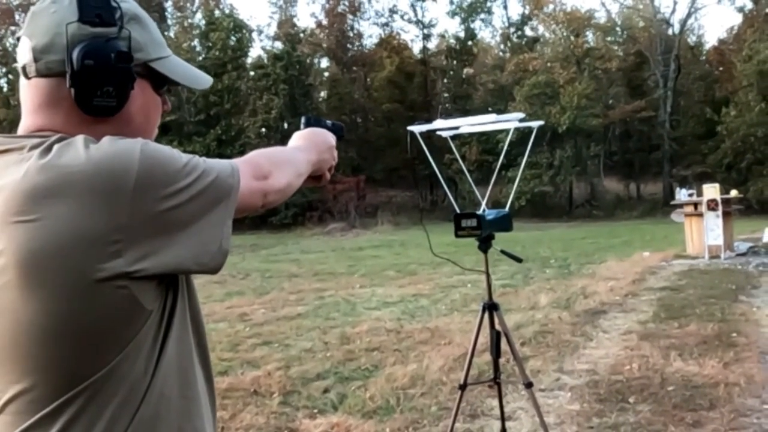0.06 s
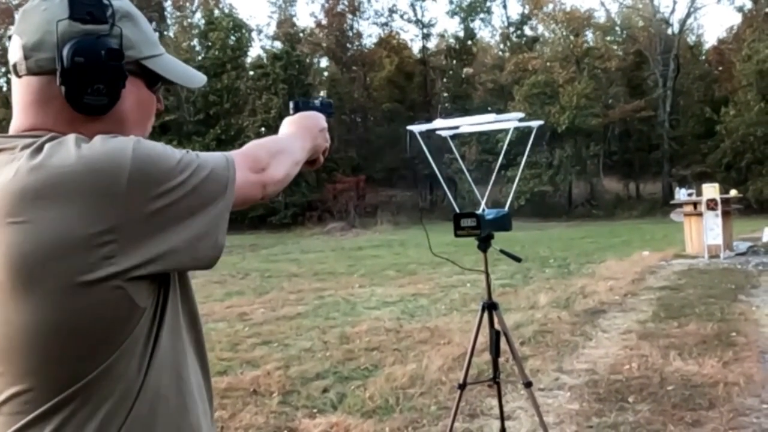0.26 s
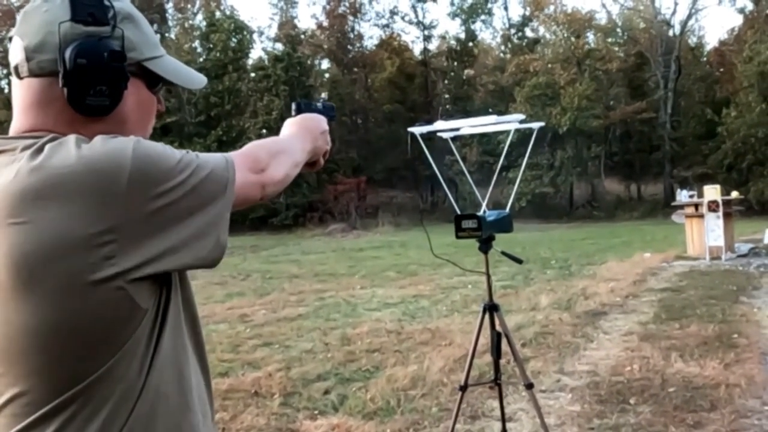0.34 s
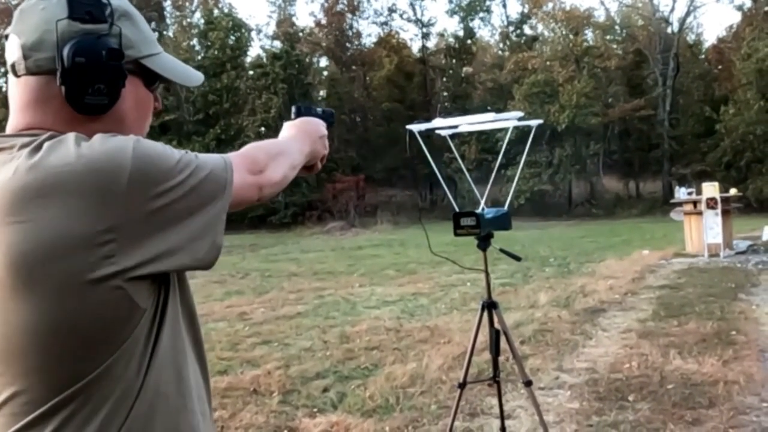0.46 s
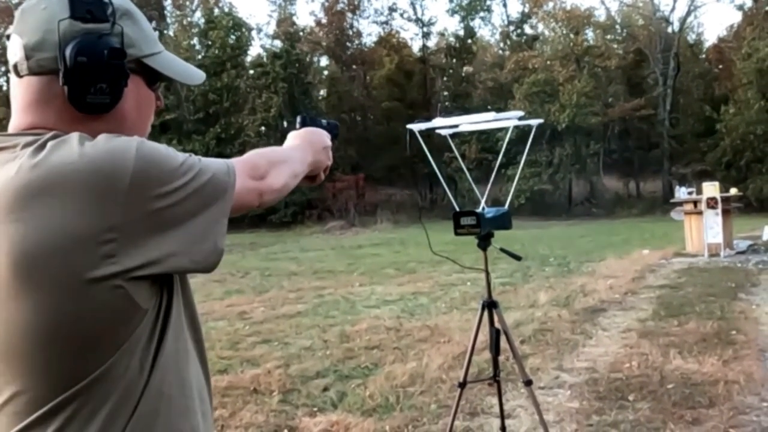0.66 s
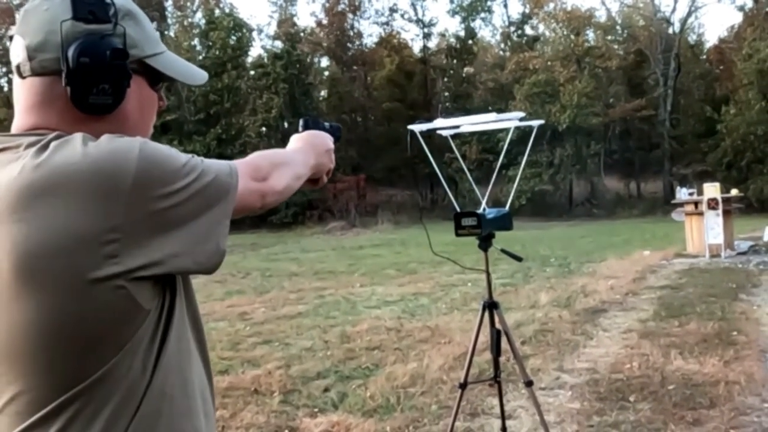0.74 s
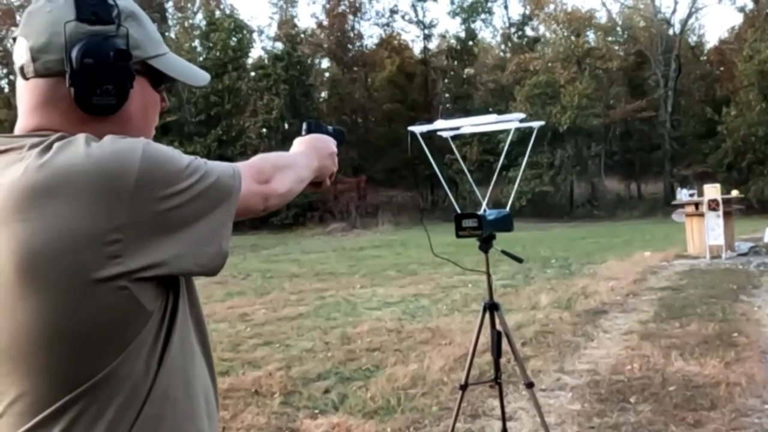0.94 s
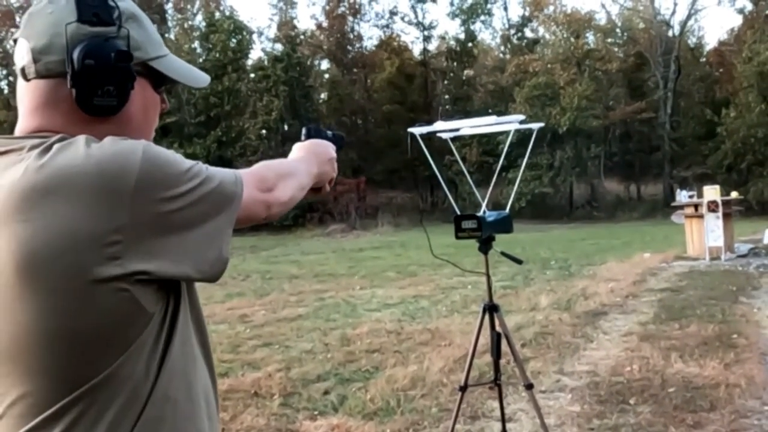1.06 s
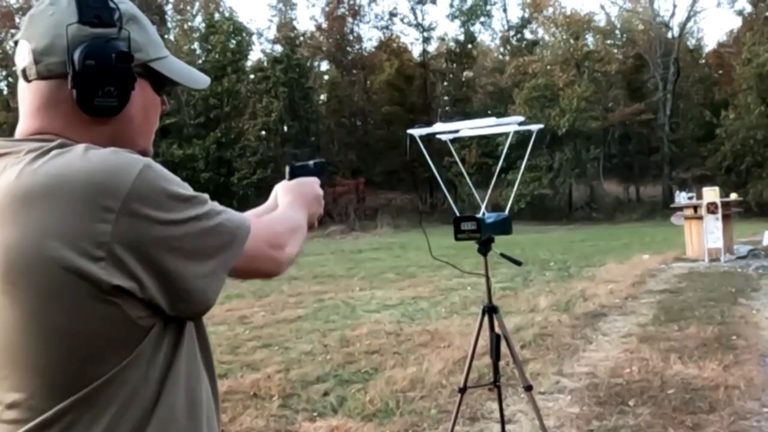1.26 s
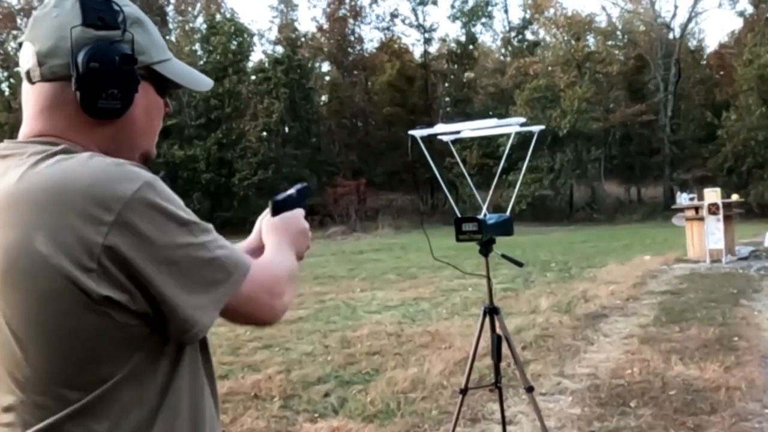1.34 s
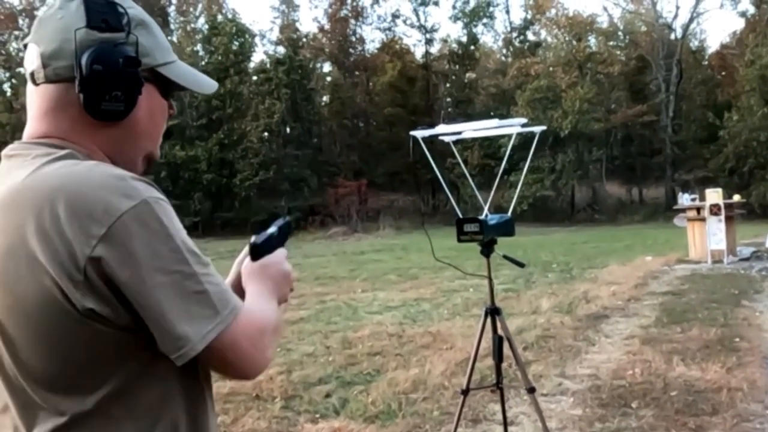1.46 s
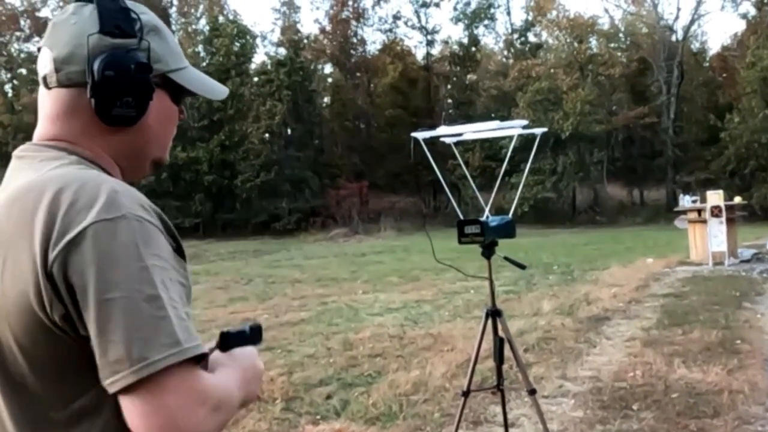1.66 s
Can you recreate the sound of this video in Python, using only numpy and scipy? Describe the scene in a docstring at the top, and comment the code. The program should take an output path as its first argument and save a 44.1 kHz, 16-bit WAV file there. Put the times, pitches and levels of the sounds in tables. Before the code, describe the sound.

A single pistol shot, loud and clipped, bursts after a moment of soft wind and insects, slaps back from nearby surfaces, then rolls through trees as the spent case ticks onto gravel; close camera microphone outdoors.

```python
"""Soft wind, hiss and pulsing insects, then a tiny trigger tick and one pistol shot in an open field.
The shot stutters in as quieter, mostly duller forerunners over a swelling boom, then cracks and bounces off the ground.
It is noise ringing at a few pitches. Near objects return short rings, large surfaces low thumps, and
tree trunks a dense, darkening echo built from many clicks. Filtered noise and damped sines make the
spent case tick and ring as it lands in the gravel. Wind, hiss and insects are softer after the shot."""
import sys
import numpy as np
from scipy import signal
from scipy.fft import rfft, irfft
from scipy.io import wavfile

SR = 44100
rng = np.random.default_rng(int(sys.argv[2]) if len(sys.argv) > 2 else 0)


def field_ratio(decibels):
    """Amplitude ratio for a level in dB (20 dB per decade); scalars and array-likes work."""
    return 10 ** (np.asarray(decibels, dtype=float) / 20)


def wav_record(signal):
    """Record a signal, one row per channel, as 16-bit PCM in the file named by sys.argv[1]."""
    frames = np.transpose(np.atleast_2d(signal))
    bounded = np.clip(frames, -1, 1)
    # unit amplitude maps onto the largest positive 16-bit level
    quanta = np.round(bounded * 32767).astype(np.int16)
    wavfile.write(sys.argv[1], SR, quanta)


N = 74970  # samples in the scene
SHORT = 4096  # samples in a brief sound
TIME = np.arange(N) / SR  # seconds
SIGNS = np.array([[1], [-1]])  # left, right
SHOT_S = 0.2217  # when the direct blast starts


def col(table, order):
    """One column of a table."""
    return np.array(table, float)[:, order]


def over_time(table, order):
    """A column read at every sample; the first column holds the seconds."""
    return np.interp(TIME, col(table, 0), col(table, order))


def on_log(table, hz):
    """A table of Hz and value, read on a log frequency axis."""
    return np.interp(np.log(np.maximum(hz, 1)), np.log(col(table, 0)), col(table, 1))


def band(x, lo_hz, hi_hz):
    """Keep the range between two frequencies."""
    return signal.sosfilt(signal.butter(2, [lo_hz, hi_hz], "band", fs=SR, output="sos"), x)


def low(x, hz):
    """Steep low-pass: keep what lies below hz."""
    return signal.sosfilt(signal.butter(4, hz, fs=SR, output="sos"), x)


def colour(x, table):
    """Shape a noise by points of Hz and dB, then scale it to an rms of 1."""
    gain = field_ratio(on_log(table, np.fft.rfftfreq(N, 1 / SR)))
    y = irfft(rfft(x) * gain, N)
    return y / np.sqrt(np.mean(y ** 2))


def fall(t60, size=SHORT):
    """Decay by 60 dB in t60 seconds."""
    return field_ratio(-60 * np.arange(size) / SR / t60)


def ring(hz, t60, lead=0., size=SHORT):
    """A damped sine, as from something struck; lead is its starting phase in radians."""
    return np.sin(2 * np.pi * hz * np.arange(size) / SR + lead) * fall(t60, size)


def add(out, sound, s, db, pan_db=0.):
    """Mix a sound in at s seconds; pan_db is left minus right."""
    i = int(s * SR)
    part = (sound * field_ratio(db + pan_db * SIGNS / 2))[:, :N - i]
    out[:, i:i + part.shape[1]] += part


def air():
    """Wind rumble and faint hiss are coloured noise; insects are treble noise in quick pulses."""
    # Wind and hiss. Each row: frequency in Hz, relative level in dB per Hz.
    wind_colour = [(15, -33), (25, -2), (97, -5), (163, -20), (181, -32), (229, -21), (312, -40),
                   (540, -38), (1380, -35), (3090, -46.5), (3340, -51.5), (5330, -41), (12600, -47.5),
                   (16400, -75.5), (22000, -120)]
    insect_hz = 6800, 13020
    pulses_per_s, first_pulse_s = 65.5, 0.0105  # middle of the first pulse
    # Everything here goes down 15.5 dB around the shot, within 40 ms.
    after = np.clip((TIME - SHOT_S + 0.017) / 0.04, 0, 1)
    drop_db = -15.5 * after

    wind = colour(rng.standard_normal((2, N)), wind_colour)
    mid, side = wind - 0.7 * band(wind, *insect_hz)  # thinner where the insects chirr
    width = 0.78 * (1 - 0.9 * after)  # narrower after the shot
    wind = (mid + width * side * SIGNS) * field_ratio(-49 + drop_db)

    throb = np.cos(np.pi * pulses_per_s * (TIME - first_pulse_s)) ** 2
    chirr = band(rng.standard_normal((2, N)), *insect_hz) * throb
    return wind + chirr * field_ratio(-58.5 + drop_db)


def ticks():
    """Trigger and spent case tick as short noise bursts; the bouncing case also rings as damped sines."""
    # Ticks. Each row: start in seconds, level in dB, main frequency in Hz, time to fall 60 dB in seconds.
    tick_list = [(0.1557, -45, 2980, 0.00323), (1.0327, -30, 4500, 0.0049), (1.0373, -43, 5500, 0.0068),
                 (1.046, -46.5, 5540, .008), (1.1275, -44, 2500, .01), (1.3, -55, 5000, 0.058)]
    # Second bounce of the case. Each row: frequency in Hz, level in dB, time to fall 60 dB in seconds.
    knock = [(2080, -39.5, 0.025), (3370, -50, 0.037), (5000, -52, 0.024)]
    out = np.zeros((2, N))
    noises = rng.standard_normal((len(tick_list), SHORT))
    for (s, db, hz, t60), noise in zip(tick_list, noises):
        tick = band(noise * fall(t60), hz / 2.4, hz * 2)
        add(out, low(tick, hz * 1.7), s, db)

    # The thin ring of the brass throbs 40 times a second as the case spins.
    size = 16384
    tumble = 0.72 + 0.4 * np.cos(2 * np.pi * 40 * np.arange(size) / SR)
    add(out, ring(10120, 0.29, size=size) * tumble, 1.033, -65.5)
    for hz, db, t60 in knock:
        add(out, low(ring(hz, t60), hz * 1.6), 1.1265, db)
    return out


def trees():
    """Every trunk returns a click of its own size; the rolling echo grows weaker and duller in the long run."""
    # Course of the echo. Each row: time in seconds, level near 1 kHz in dB, treble level in dB,
    # bass level in dB. Of the treble, only its distance from the 1 kHz level counts, compared with 0.6 s.
    roll = [(.235, -36, -47, -58), (.26, -57.5, -57.5, -38), (.285, -48.5, -48, -46),
            (.32, -36.5, -39.5, -26.5), (.355, -53, -54.5, -53), (.375, -35.5, -50, -35),
            (.40, -39, -46.5, -50.5), (.425, -28.5, -41.5, -29), (.45, -30, -40.5, -32.5),
            (.488, -28.5, -43.5, -40), (.508, -30.5, -42.5, -46), (.535, -24.5, -40.5, -37),
            (.6, -25.5, -47, -43), (.74, -30.5, -56, -52), (.95, -36.5, -68, -57.5),
            (1.07, -39.5, -66.5, -57), (1.2, -42.5, -72.5, -61.5), (1.7, -46.5, -88, -71)]
    # Tone of the clicks. Each row: frequency in Hz, relative level in dB per Hz.
    click_colour = [(210, -51), (350, -15), (479, -4), (786, 1), (970, 1.5), (1060, -3), (1160, -4),
                    (1640, -13), (3170, -20), (12600, -56), (16400, -90.5), (22000, -120)]
    # Tone of the bass. Each row: frequency in Hz, relative level in dB per Hz.
    bass_colour = [(15, -61.5), (25, -18), (167, -1.5), (215, -9), (242, -16.5), (340, -10.5), (440, -15.5),
                   (750, -120)]
    # Left against right. Each row: frequency in Hz, squared likeness from 0 to 1.
    likeness = [(60, 0.99), (130, 1.0), (270, 0.98), (580, 1), (1250, 0.97), (2660, 0.67), (5690, 1),
                (12100, 0)]
    trunks_per_s, size_spread_db = 9000, 1.23
    tilt_from_hz, tilt_full_hz = 1310, 4500  # the treble change starts here, is complete here

    freqs = np.fft.rfftfreq(N, 1 / SR)
    like = on_log(likeness, freqs) ** 0.5

    def wide(x):
        """Spectrum of a stereo pair with the wanted likeness, from two separate noises."""
        shared = np.sqrt((1 + like) / 2) * rfft(x[0])
        opposed = np.sqrt((1 - like) / 2) * rfft(x[1])
        return shared + opposed * SIGNS

    hit = rng.random((2, N)) < trunks_per_s / SR
    size = field_ratio(size_spread_db * rng.exponential(size=(2, N)))
    clicks = hit * size * rng.standard_normal((2, N))
    clicks = clicks + 0.3 * rng.standard_normal((2, N))  # fine noise between the clicks
    click_spectrum = wide(colour(clicks, click_colour))

    level, treble, bass = (over_time(roll, k) for k in (1, 2, 3))
    tilt = treble - level
    tilt = tilt - np.interp(0.6, TIME, tilt)
    bass_noise = colour(rng.standard_normal((2, N)), bass_colour)
    out = irfft(wide(bass_noise), N) * field_ratio(bass)
    # Half-octave slots overlap, so that each can fade at its own pace.
    for hz in 200 * 2 ** np.arange(0, 7, 0.5):
        share = np.log(hz / tilt_from_hz) / np.log(tilt_full_hz / tilt_from_hz)
        share = np.clip(share, 0, 1.3)
        slot = np.clip(1 - 2 * np.abs(np.log2(freqs / hz + 1e-9)), 0, 1)
        out = out + irfft(click_spectrum * slot, N) * field_ratio(level + share * tilt)
    return out * np.clip((TIME - SHOT_S) / 0.03, 0, 1)  # silent before the shot


def slaps():
    """Near objects return a short ring with a noisy crack; large surfaces return a low, damped thump."""
    # Near objects. Each row: start in seconds, ring level in dB, crack level in dB, left minus right in dB.
    slap_list = [(0.303, -17, -42, -4), (0.3069, -13.5, -37, -1.5), (0.3082, -28, -17.5, -9.5),
                 (0.366, -16.5, -57, 6.5), (0.4049, -20.5, -41, -15), (.4975, -6, -44, 4),
                 (0.517, -2.5, -48, -4), (0.521, -5, -40.5, 5.5), (1.0715, -16.5, -65, 2.5),
                 (1.625, -28, -80, -9)]
    # Large surfaces. Each row: start in seconds, level in dB, frequency in Hz, cycles to fall 60 dB,
    # left minus right in dB.
    thumps = [(0.229, -1, 139, 1, 6), (0.2915, -22, 131, 2.6, 0.5), (0.3103, -3.5, 95, 1.1, -5),
              (0.376, -22, 152, 2.8, 2), (0.406, -15, 130, 3.6, 1), (0.514, -19, 138, 10.5, 0.5)]
    hz, t60 = 1033, 0.013  # main ring in Hz, its time to fall 60 dB in seconds
    out = np.zeros((2, N))
    rise = 1 - np.exp(-(np.arange(SHORT) / SR / 0.0012) ** 2)  # soft start, about 1.2 ms
    slap = ring(hz, t60) + 0.5 * ring(hz * 1.354, t60) - 0.5 * ring(hz * 0.69, t60)
    slap = slap * rise

    noises = rng.standard_normal((len(slap_list), 2, SHORT))
    for (s, db, crack_db, pan), noise in zip(slap_list, noises):
        add(out, slap, s, db, pan)
        nearly_mono = noise[0] + 0.2 * noise
        add(out, band(nearly_mono * fall(0.0027), 1500, 9300), s, crack_db, pan)
    for s, db, thump_hz, cycles, pan in thumps:
        add(out, -low(ring(thump_hz, cycles / thump_hz), 490), s, db, pan)
    return out


def boom():
    """Steady low sines swell under the forerunners and fade just after the shot."""
    # Sines. Each row: frequency in Hz, level in dB before the swell, left minus right in dB,
    # lead of the left in radians.
    boom_tones = [(145, -20.5, -6.5, 0.94), (226.8, -18.5, -2, 0.88)]
    # The swell. Each row: time in seconds, gain in dB.
    boom_level = [(.178, -32.5), (.193, -14), (.203, 0), (.226, 6.5), (.236, -5), (.25, -36.5)]
    swell = field_ratio(np.interp(TIME, col(boom_level, 0), col(boom_level, 1), left=-120, right=-120))
    out = np.zeros((2, N))
    for hz, db, pan, lead in boom_tones:
        tone = np.sin(2 * np.pi * hz * (TIME - SHOT_S) + lead * SIGNS / 2)
        out += tone * field_ratio(db + pan * SIGNS / 2)
    return low(out * swell, 800)


def blast(gas):
    """Turbulent gas excites the blast's ring and snap; the ground repeats both, duller."""
    # The ring. Each row: frequency in Hz, relative level in dB, time to fall 60 dB in seconds,
    # left minus right in dB, lead of the left in radians.
    blast_ring = [(432, -21, .014, -2.5, 0.72), (670, 2.5, 0.017, -8.5, 0.28), (945, -2, 0.02, 0, -0.15),
                  (1229, 11.5, 0.0095, 2.5, -1.4), (2000, -10.5, 0.0055, -5, 0.65)]
    # Broad treble of the shock front. Each row: frequency in Hz, relative level in dB per Hz.
    snap_colour = [(800, -43.5), (1600, -3.5), (3200, -4.5), (5500, 1), (8000, -12), (11500, -11.5),
                   (16000, -16), (21000, -61.5)]
    rise = np.clip(np.arange(SHORT) / SR / 0.0008, 0, 1)  # 0.8 ms
    body = np.zeros((2, SHORT))
    for hz, db, t60, pan, lead in blast_ring:
        body += ring(hz, t60, lead * SIGNS / 2) * field_ratio(db + pan * SIGNS / 2)
    fizz = gas[0, :, :SHORT] * fall(0.013) * rise
    rung = signal.fftconvolve(body, fizz, axes=1)[:, :SHORT]

    snap_fall = fall(0.013) + field_ratio(-25.5) * fall(0.094)  # quick drop, then a faint tail
    snap = colour(gas[1], snap_colour)[:, :SHORT] * rise * snap_fall
    direct = rung / np.abs(rung).max() + field_ratio(-8.5) * snap
    bounce = np.roll(direct, int(0.0048 * SR), axis=1)  # 4.8 ms later
    return direct + field_ratio(-4) * low(bounce, 5200)


def pistol():
    """The blast, led in by quieter copies whose noise differs in part, with the boom under them."""
    # Forerunners, earliest first. Each row: level in dB, gain of the treble above 5 kHz in dB.
    forerunners = [(-27.5, 0), (-13.5, -13.5), (-4.5, -15), (-6.5, -15)]
    step_s = 0.01067  # from one copy to the next
    alike = 0.54  # likeness of the gas noise left and right, 0 to 1
    count = len(forerunners)
    # One set of noises per copy and one for the blast; each set feeds the ring and the snap.
    noise = rng.standard_normal((count + 1, 2, 2, N))
    shared, opposed = noise[:, :, :1], noise[:, :, 1:]
    gas = np.sqrt((1 + alike) / 2) * shared + np.sqrt((1 - alike) / 2) * opposed * SIGNS

    out = np.zeros((2, N))
    add(out, blast(gas[-1]), SHOT_S, 4)
    for k, (db, treble_db) in enumerate(forerunners):
        full = blast(gas[-1] + 0.5 * gas[k])
        dull = low(full, 5000)
        add(out, dull + field_ratio(treble_db) * (full - dull), SHOT_S - (count - k) * step_s, db)
    return out + boom()


def scene():
    """All sources together, from the background to the shot."""
    return air() + ticks() + trees() + slaps() + pistol()


def roll_off(x):
    """The treble ends steeply here."""
    return signal.sosfilt(signal.butter(12, 12740, fs=SR, output="sos"), x)


def record(dry):
    """The camera clips whatever goes beyond full scale."""
    clipped = np.clip(dry, -1, 1)
    return roll_off(clipped)


dry = scene()
out = record(dry)
wav_record(out)
```